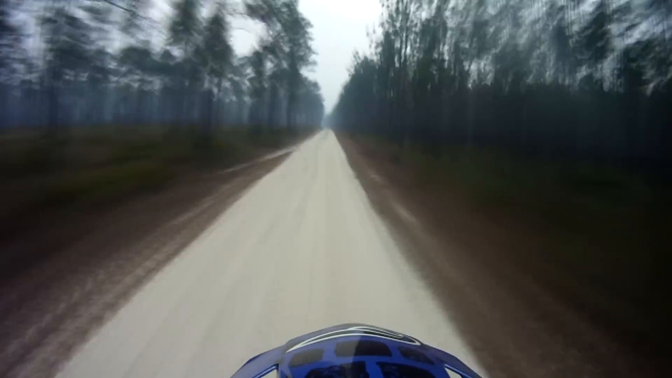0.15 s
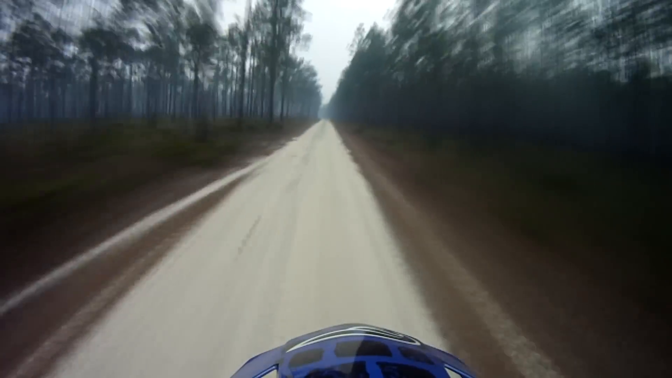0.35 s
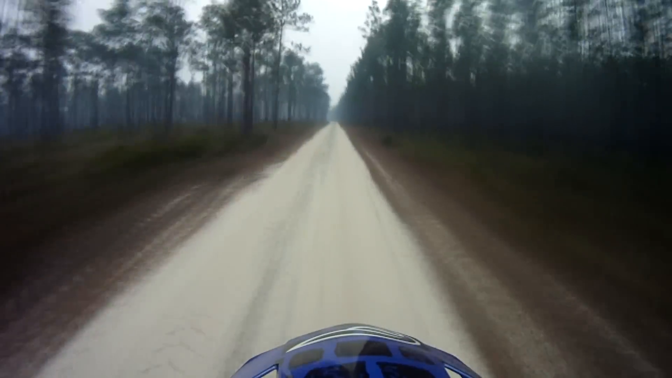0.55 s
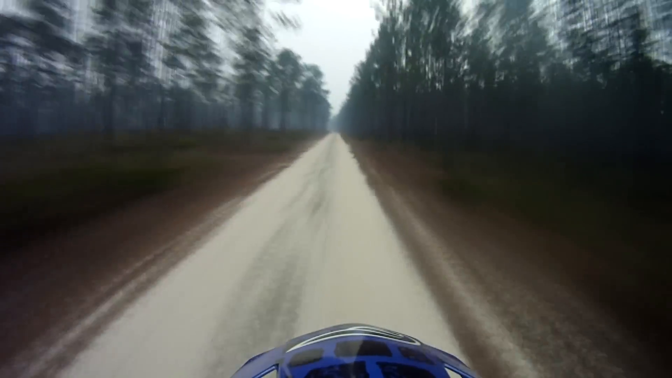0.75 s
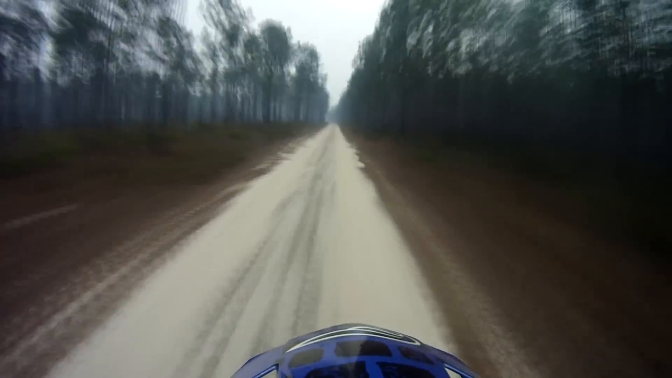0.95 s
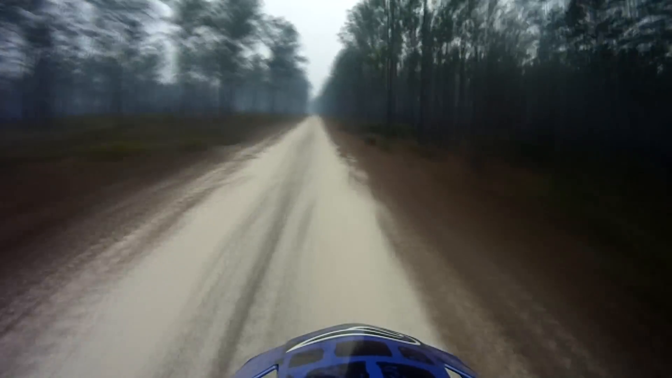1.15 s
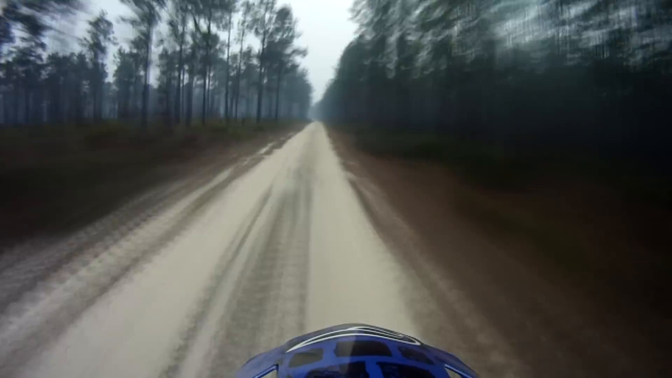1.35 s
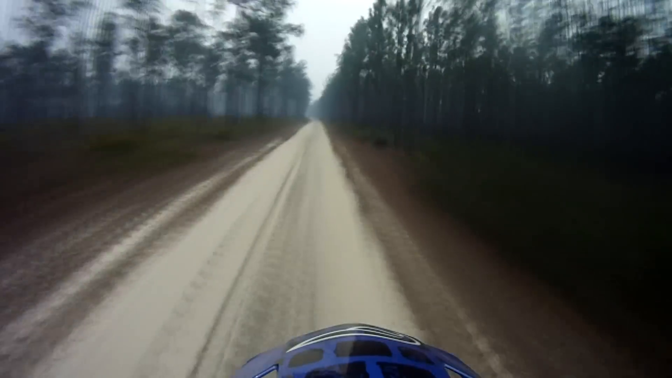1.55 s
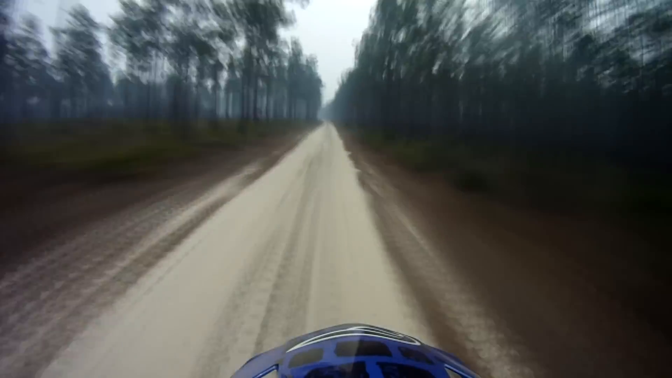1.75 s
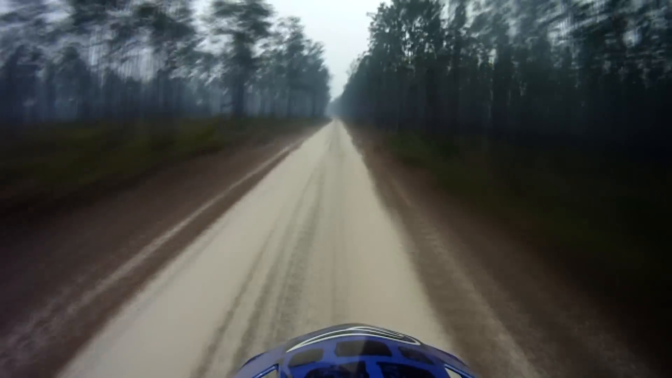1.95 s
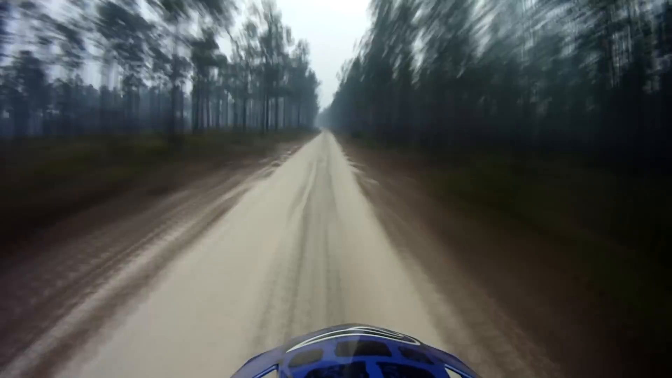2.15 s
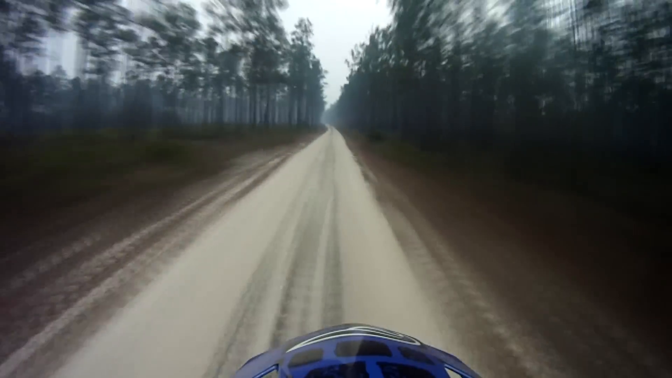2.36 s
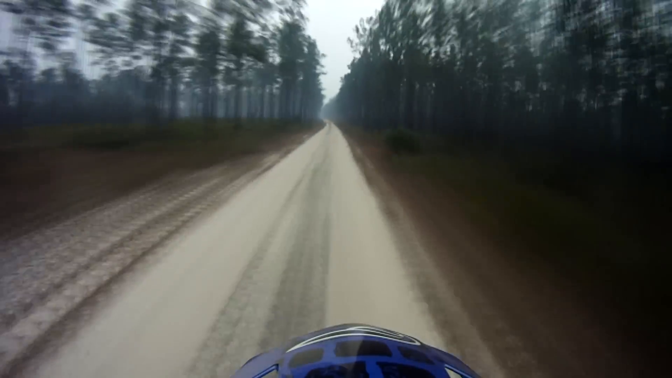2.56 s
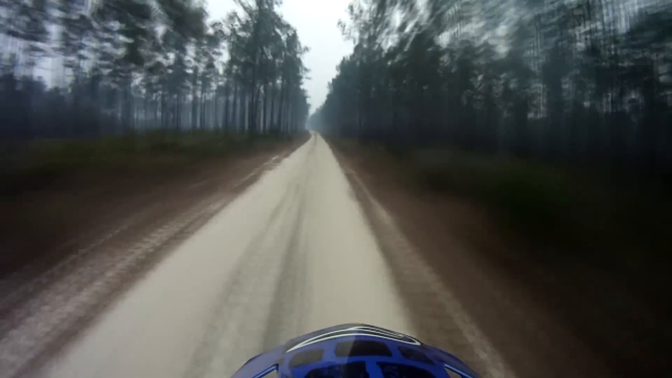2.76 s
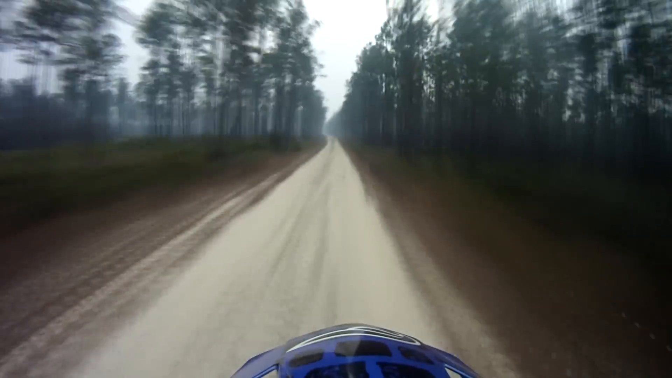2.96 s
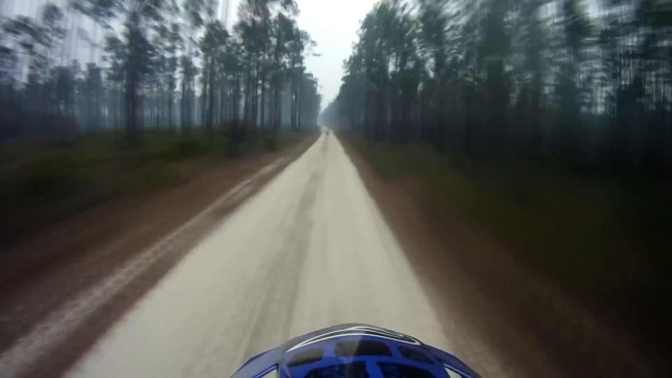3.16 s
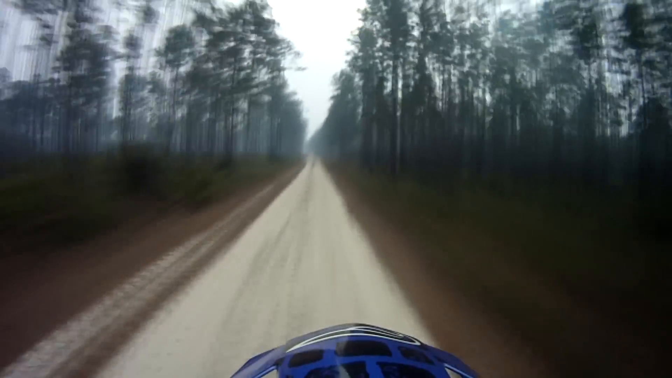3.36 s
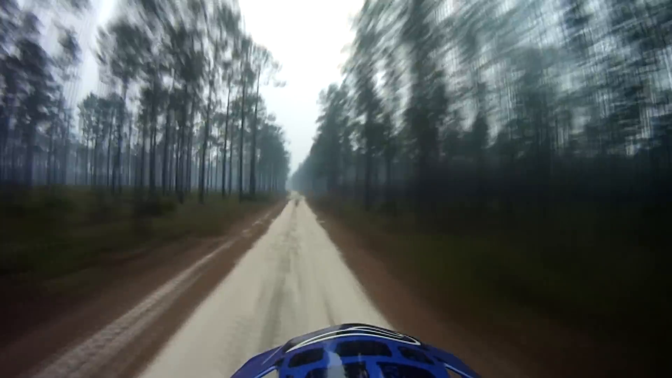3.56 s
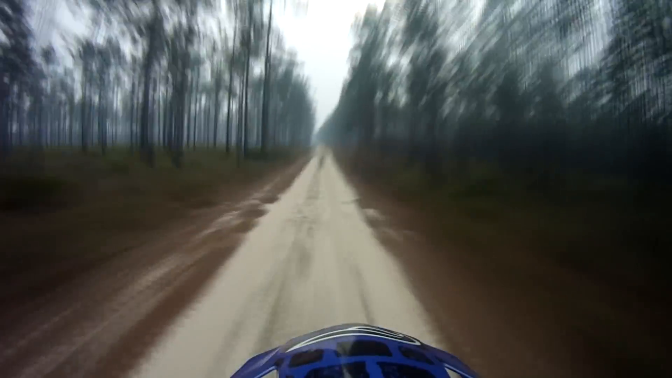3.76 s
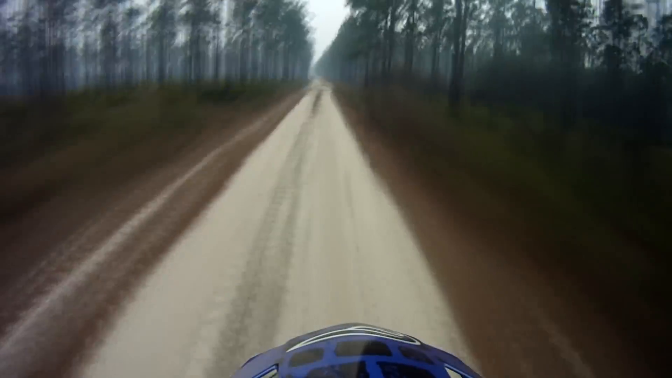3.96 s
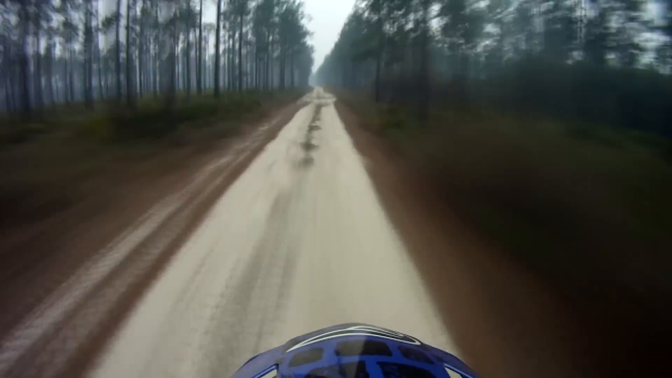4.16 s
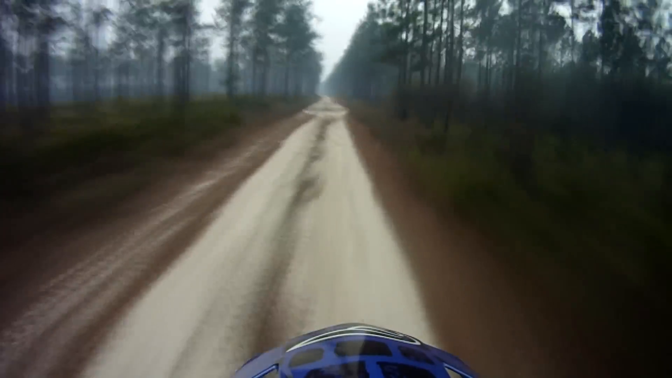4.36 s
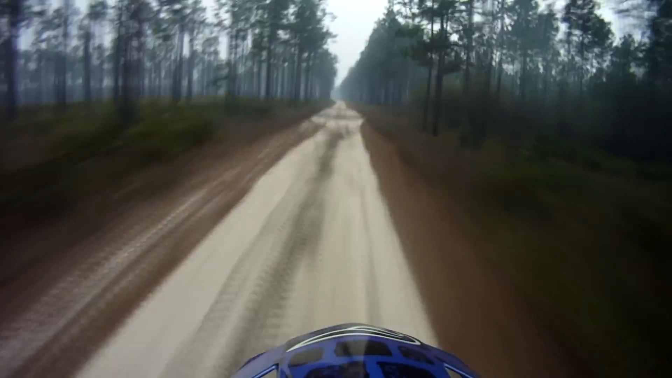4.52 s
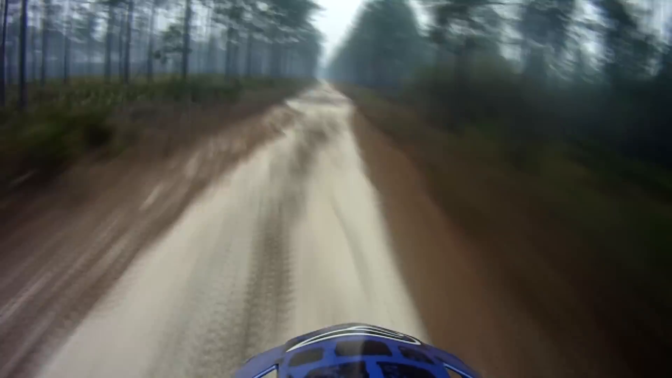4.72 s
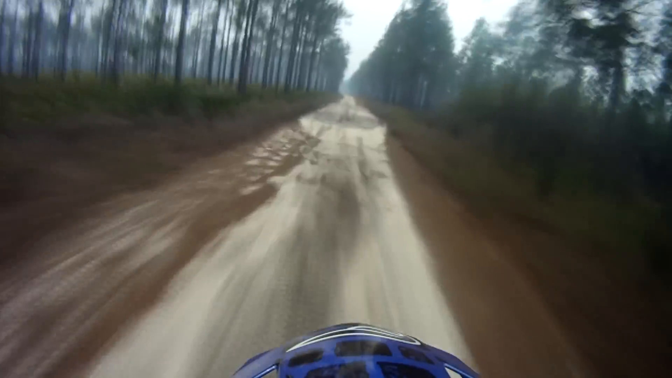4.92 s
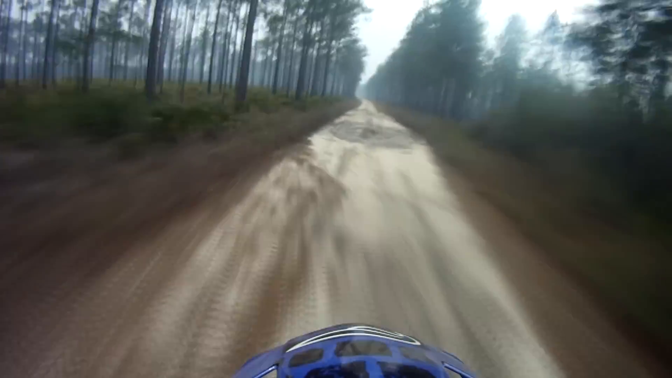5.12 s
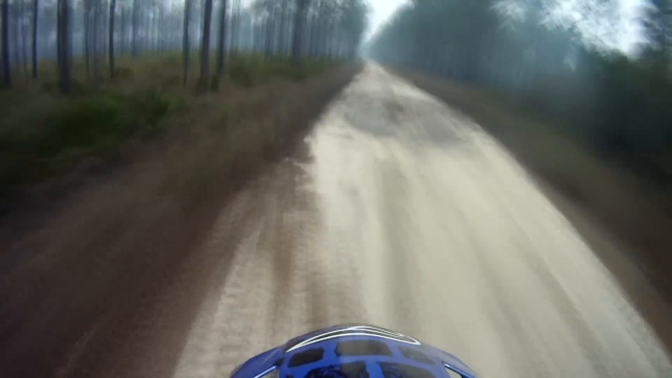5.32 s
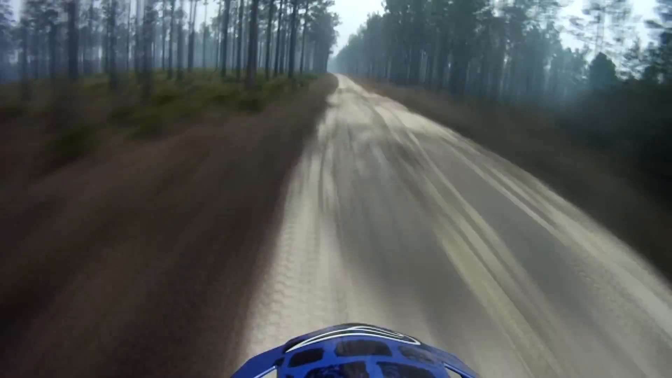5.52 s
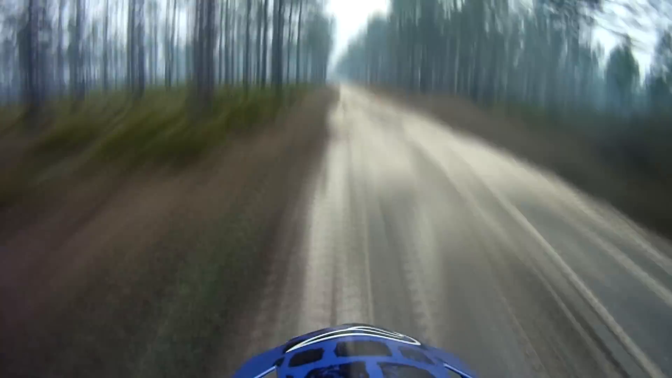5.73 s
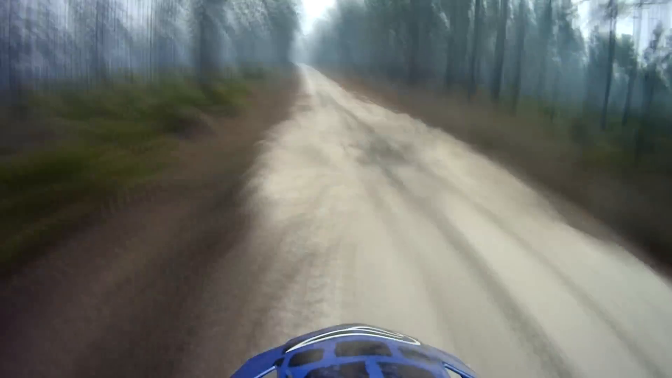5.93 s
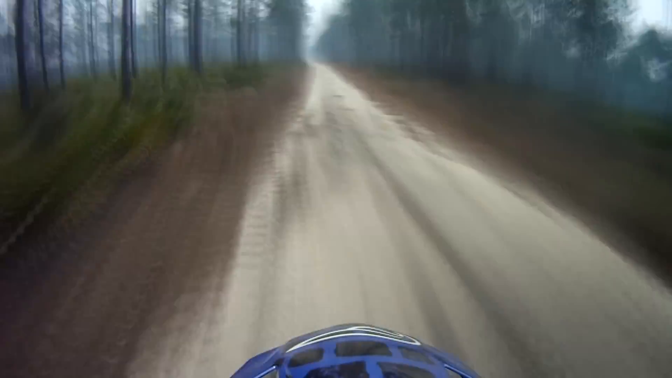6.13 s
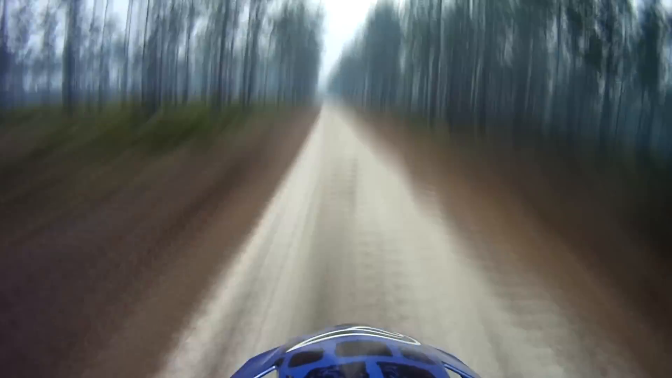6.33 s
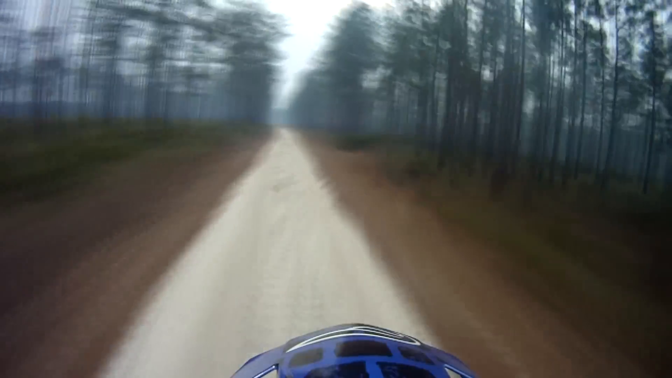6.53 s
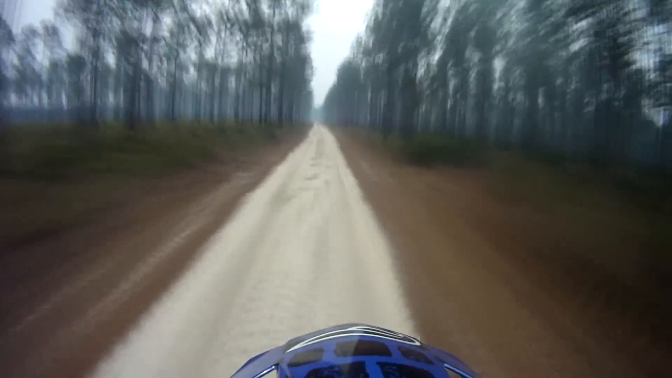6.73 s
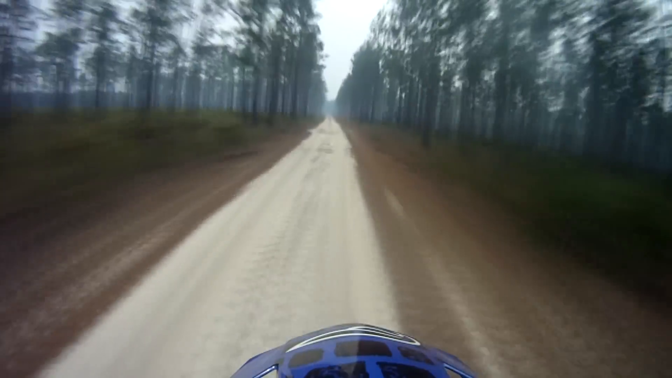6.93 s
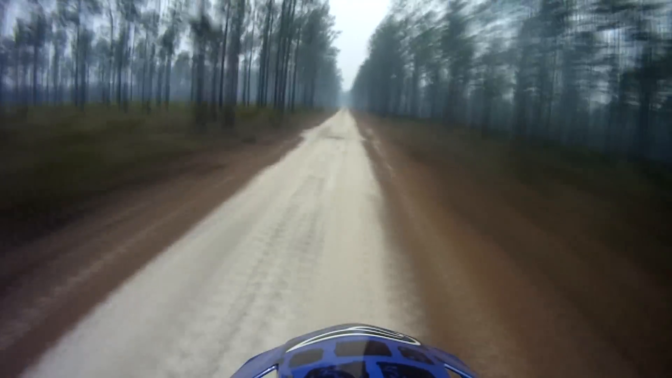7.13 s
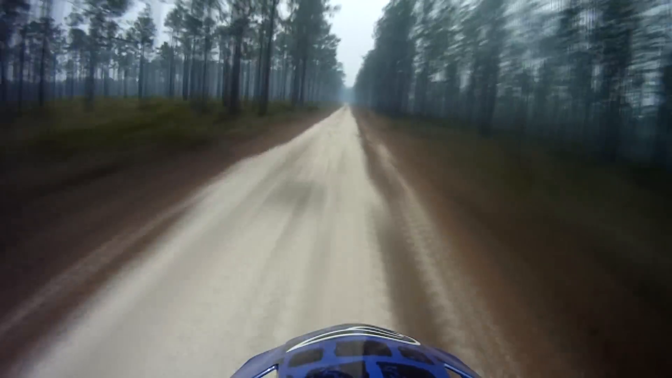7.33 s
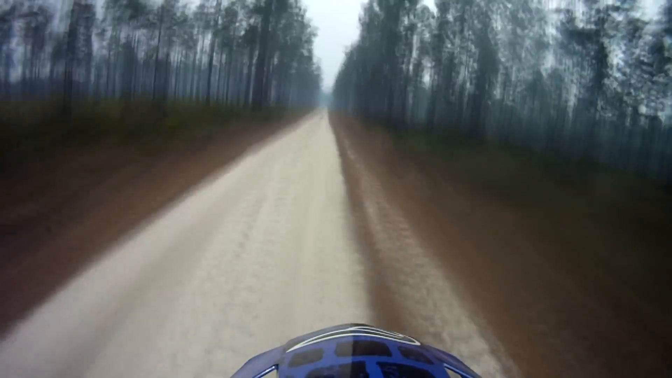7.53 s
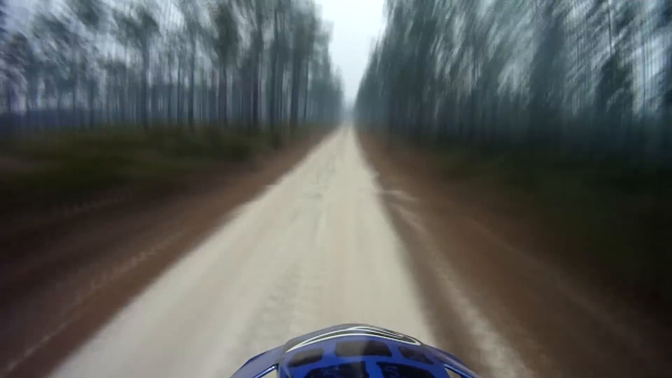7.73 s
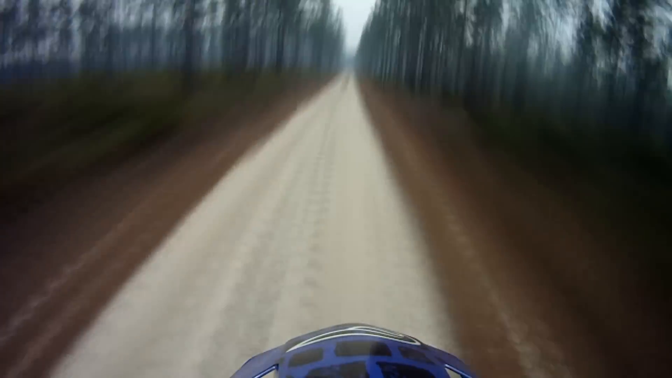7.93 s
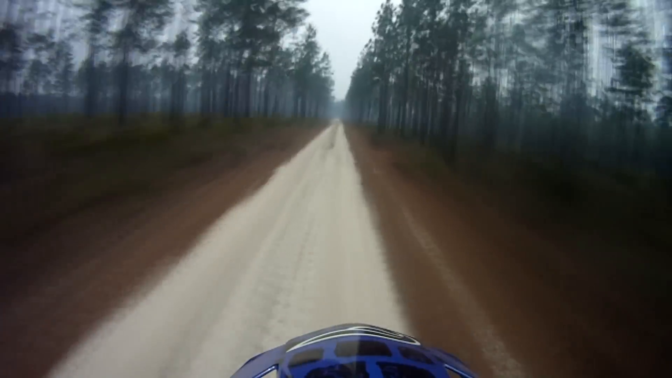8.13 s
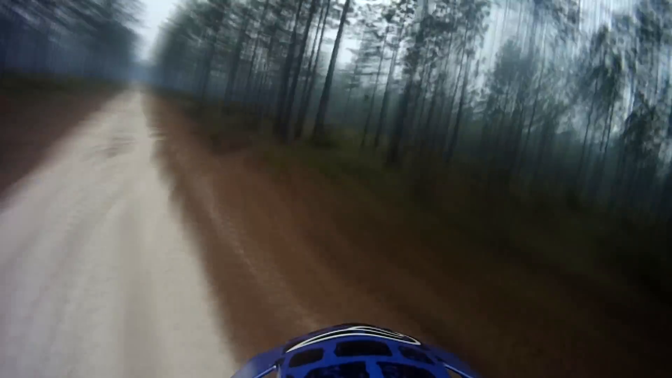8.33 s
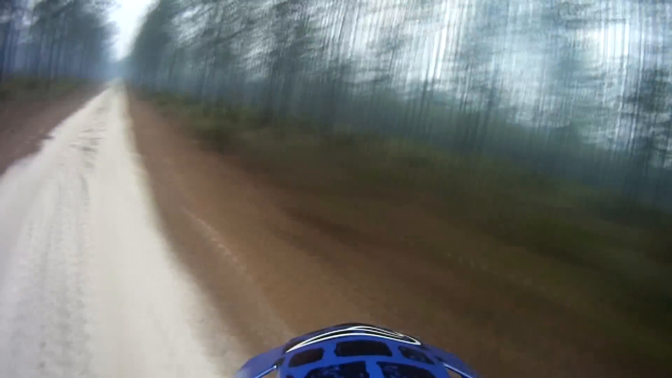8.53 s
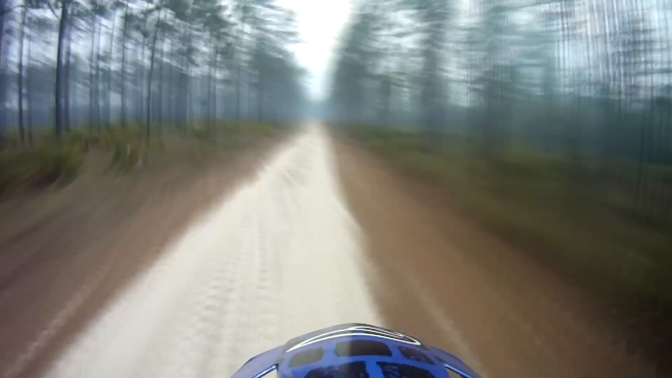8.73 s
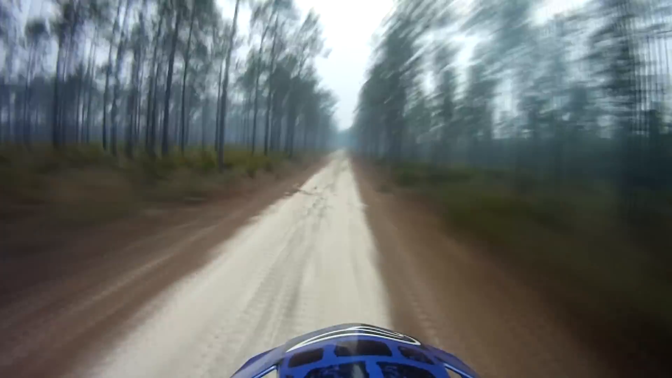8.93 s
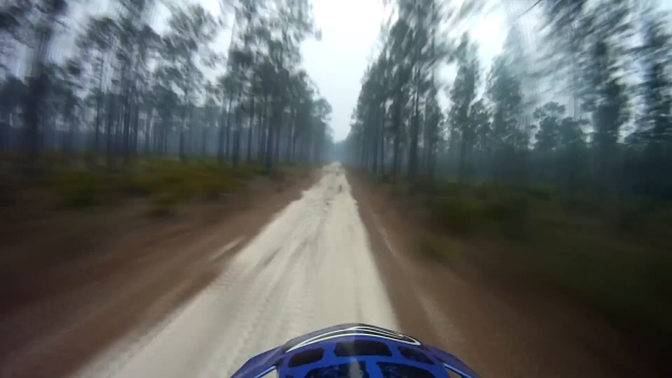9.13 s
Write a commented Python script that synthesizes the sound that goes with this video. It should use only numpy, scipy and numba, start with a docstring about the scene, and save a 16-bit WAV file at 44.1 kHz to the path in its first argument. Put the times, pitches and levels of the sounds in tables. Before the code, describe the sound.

A helmet-mounted microphone on a motorcycle is swamped by rough, fluttering wind roar, with breathy whistles and a faint wavering exhaust drone underneath. Around four seconds the wind falls sharply to a near hush as the rider slows for a rough patch. The engine then pulls up through the gears, a heavy low thud hits just after six seconds, and the roar returns, easing slightly at the end.

```python
"""A helmet camera in a closed case rides a motorcycle along a dirt road, its one microphone in the wind.
At full speed coloured noise roars through the resonances of the case, and narrow noise whistles at its gaps.
The rider slows until the roar sinks; then speeds up through the gears, with sine thuds from the mount.
Throughout, low noise bands shake the mount and a wavering exhaust order drones faintly.
Samples held at 12 kHz mirror the sound in the treble; three spliced strands overlap."""
import sys
import numpy as np
from scipy import signal
from scipy.fft import rfft, irfft, next_fast_len
from scipy.io import wavfile
from scipy.ndimage import uniform_filter1d
from numba import njit

SR = 44100
rng = np.random.default_rng(int(sys.argv[2]) if len(sys.argv) > 2 else 0)


def generate_wav(sig):
    """Save sig (samples, or channels by samples) to the path in sys.argv[1] as 16-bit PCM at SR."""
    pcm = np.round(np.clip(np.atleast_2d(sig).T, -1, 1) * 32767).astype(np.int16)
    wavfile.write(sys.argv[1], SR, pcm)


def amplitude_ratio(level_db):
    """Convert a level in decibels to the matching linear amplitude (field) ratio."""
    exponent = np.asarray(level_db, float) / 20
    return 10 ** exponent


N = 404838
CLOCK = 12000  # Hz, sample clock of the camera
COUNT = N * CLOCK // SR + 8
T = np.arange(COUNT) / CLOCK  # s
CRUISE_DB = -27  # airflow level at full speed

# airflow over the case: t/s, airflow level/dB, brightness/dB as the head turns in the stream
AIRFLOW = [(0.0, -27.5, 0), (1.18, -28.5, -0.5), (1.2, -29.5, 0.5), (1.81, -27, 0), (2.38, -28, -0.5),
           (2.74, -27.5, 0), (2.76, -30, 0.5), (3.01, -28, -0.5), (3.48, -32.5, 0.5), (3.58, -30, -3),
           (3.91, -37, 0), (4.86, -55.5, 0.5), (5.34, -51.5, 0), (5.85, -42.5, -1.5), (6.01, -38, -1),
           (6.08, -38.5, 0.5), (6.39, -37, 0), (6.62, -32, 0), (7.54, -31.5, 1), (7.75, -28, 0.5),
           (8.08, -32.5, 2), (8.13, -30, 1), (8.82, -36, 1), (9.18, -37, -0.5)]


def curves(table):
    """Columns of a table at every tick of the clock."""
    s, *columns = np.transpose(table)
    return [np.interp(T, s, column) for column in columns]


def follow(full_db, slope):
    """Level in dB of a layer that grows with the airflow: level at full speed, dB per dB of airflow."""
    return full_db + slope * (curves(AIRFLOW)[0] - CRUISE_DB)


def unit(x):
    """Scale to rms 1."""
    return x / np.sqrt(np.mean(x ** 2))


def noise():
    """White noise."""
    return rng.standard_normal(COUNT)


def walk(rate):
    """Random levels held 1 / rate s and slewed twice."""
    k = int(CLOCK / rate)
    steps = np.repeat(rng.standard_normal(COUNT // k + 1), k)
    return uniform_filter1d(uniform_filter1d(steps, k), k)[:COUNT]


@njit
def svf(x, hz, width, clock):
    """Band-pass with a moving centre, gain 1 there."""
    y, b, l = np.empty(len(x)), 0., 0.
    for i in range(len(x)):
        g, k = np.tan(np.pi * hz[i] / clock), width / hz[i]
        v = (b + g * (x[i] - l)) / (1 + g * (g + k))
        b, l, y[i] = 2 * v - b, l + 2 * g * v, k * v
    return y


def ring(x, hz, width):
    """A resonance applied twice, so that its flanks are steep; width in Hz is that of one pass."""
    hz = hz + 0 * T
    once = svf(x, hz, 1. * width, 1. * CLOCK)
    return svf(once, hz, 1. * width, 1. * CLOCK)


def bursts(table):
    """Short sine swings under a bell-shaped swell."""
    out = 0
    for s, db, hz, length in table:
        bell = np.exp(-((T - s) / length) ** 2)
        out = out + amplitude_ratio(db) * bell * np.sin(2 * np.pi * hz * (s - T) + .5)
    return out


def engine():
    """One wavering exhaust order stands clear; uneven firings at a quarter of it ring the pipe."""
    # engine speed and load, dropping at each upshift: t/s, f/Hz of the nominal exhaust order, level/dB
    revs = [(0, 262, -53.5), (1.4, 268, -49.5), (2.5, 287, -49), (3.1, 285, -53), (3.6, 270, -49),
            (4.0, 245, -73), (4.6, 235, -63), (4.9, 185, -65), (5.1, 182, -52), (5.3, 203, -55.5),
            (5.58, 232, -60), (5.66, 186, -55), (5.95, 195, -49), (6.4, 230, -55), (6.47, 180, -47.5),
            (6.9, 213, -49), (7.4, 235, -58), (8.0, 258, -51), (8.3, 245, -52), (8.6, 215, -48.5),
            (9.18, 230, -63)]
    # partials beside the strongest one: multiple of the nominal order, level/dB relative to the strongest
    overtones = [(1.75, -19), (.75, -6)]
    # resonances of the exhaust pipe: f/Hz, width/Hz of one pass, relative level/dB
    pipe_modes = [(231.8, 54, 4), (208, 71, 1.5)]
    hz, order_db = curves(revs)
    turns = np.cumsum(hz * (1 + .016 * walk(25))) / CLOCK  # cycles of the nominal order
    partials = [(0.98, 0)] + overtones
    order = unit(sum(amplitude_ratio(db) * np.sin(2 * np.pi * k * turns) for k, db in partials))
    firings = np.diff(np.floor(turns / 4), prepend=0) * amplitude_ratio(3.0 * noise())
    drive = unit(firings) + 2.0 * noise()
    pipe = unit(sum(amplitude_ratio(db) * unit(ring(drive, f, width)) for f, width, db in pipe_modes))
    pipe_db = follow(-43.5, 0.54) + 1.5 * walk(9)
    return amplitude_ratio(order_db + 2.6 * walk(11)) * order + amplitude_ratio(pipe_db) * pipe


def thuds():
    """Jolts thud in the mount as short low swings."""
    # jolts: t/s, level/dB at the peak of the swell, f/Hz, length/s from the peak down to 1/e
    blows = [(5.17, -41, 30, 0.024), (5.705, -35.5, 39.4, 0.025), (6.178, -16.5, 66, 0.011),
             (6.459, -30, 22, 0.043), (6.791, -32.5, 22, 0.058), (7.597, -31.5, 25, 0.11),
             (8.491, -29, 30, 0.039), (8.559, -36.5, 110, 0.06)]
    return bursts(blows)


def mount(swells):
    """Road and buffeting shake the mount; it rings at a few low modes."""
    # roughness of the road as felt by the mount: t/s, shaking level/dB ahead of the ring
    road = [(0, -38.5), (1.2, -41), (2.6, -38), (3.2, -44), (3.55, -40), (4.1, -51.5), (4.8, -56.5),
            (5.3, -53), (6.0, -44), (6.7, -40), (7.3, -42), (7.6, -38), (8.1, -40), (8.5, -38.5),
            (8.9, -45.5), (9.18, -45)]
    # low modes of the mount: f/Hz, width/Hz of one pass, relative level/dB
    low_modes = [(66, 20.3, -2.5), (42.8, 24, -11), (92, 77, -12), (153, 114, -14.5)]
    ring_db = 2  # ring of the mount over the shaking
    shake_swell, buffet_swell = 1 * swells  # dB
    ringing = unit(sum(amplitude_ratio(db) * unit(ring(noise(), hz, width)) for hz, width, db in low_modes))
    buffeting = unit(ring(noise(), 14.6, 57))
    shaken = amplitude_ratio(curves(road)[0] + ring_db + shake_swell) * ringing
    return shaken + amplitude_ratio(follow(-44.5, 0.29) + buffet_swell) * buffeting


def flares():
    """The whistles flare up clearly for a moment, as short swings."""
    # flares: t/s, level/dB at the peak of the swell, f/Hz, length/s from the peak down to 1/e
    whistled = [(4.0, -41, 1140, .03), (4.5, -51, 1010, 0.054), (4.77, -48, 1120, 0.031),
                (5.3, -47.5, 1150, 0.029), (5.95, -39.5, 1142, 0.057), (5.97, -36, 2240, 0.076),
                (4.95, -55, 1240, .04), (6.07, -38.5, 2410, 0.039), (6.32, -33, 1163, 0.04),
                (6.49, -33, 1180, 0.011), (8.33, -30.5, 998, 0.016)]
    return bursts(whistled)


def rush(colour, eddies, own_db, shared_db):
    """Turbulence coloured by the case; third-octave bands flicker together and alone."""
    # resonances and dips of the case: f/Hz, width/Hz, gain/dB
    case = [(780, 55, -2), (992, 44, 4), (1370, 120, 0.5), (1570, 69, 5.5), (1710, 90, -1),
            (2030, 140, -1.5), (3080, 69, 3), (640, 39, -4.5), (3667, 95, 5), (5560, 60, -6),
            (5650, 120, 4.5), (4150, 150, 3)]
    size = next_fast_len(COUNT)
    f = np.arange(1, size // 2 + 2) * CLOCK / size
    hz, db = np.transpose(colour)
    shape_db = np.interp(np.log(f), np.log(hz), db, -90, -90)
    for centre, width, gain_db in case:
        shape_db = shape_db + gain_db / (1 + (2 * (f - centre) / width) ** 2)
    spectrum, out = rfft(noise(), size) * amplitude_ratio(shape_db), 0
    thirds = 3 * np.log2(f)
    for k in range(int(3 * np.log2(hz[0])), int(3 * np.log2(hz[-1])) + 2):
        share = np.cos(np.pi / 2 * np.clip(thirds - k, -1, 1)) ** 2
        band = irfft(spectrum * share, size)[:COUNT]
        out = out + band * amplitude_ratio(own_db * walk(14))
    return unit(out * amplitude_ratio(shared_db * eddies))


def whistles(swells):
    """Air whistles through gaps of the case as two narrow bands; the high one rises as the air slows."""
    airflow_db = curves(AIRFLOW)[0]
    low_swell, high_swell = 3.0 * swells  # dB
    low = unit(ring(noise(), 1140 + 30 * walk(6), 57))
    rise_hz = 3 * (CRUISE_DB - airflow_db)
    high = unit(ring(noise(), 2120 + rise_hz, 133))
    low_gain = amplitude_ratio(follow(-39.5, 0.65) + low_swell)
    return low_gain * low + amplitude_ratio(follow(-39, 0.8) + high_swell) * high


def wind(eddies, swells):
    """Roar, treble and whoosh on one airflow, with two whistles that swell by themselves."""
    # spectra ahead of the case: f/Hz, relative level/dB per Hz
    roar = [(410, -43), (700, -18.5), (790, -10.5), (886, -5), (1130, -7.5), (1240, -4), (1570, -6),
            (1720, -7.5), (2050, 1.5), (3200, -15), (4160, -30), (7040, -120)]
    treble = [(1710, -41), (2900, -10.5), (3320, -4), (3710, -2), (4530, -13), (5240, -4), (5470, -9),
              (5990, -20), (7790, -52), (13200, -120)]
    whoosh = [(170, -17), (290, -2), (328, -7), (397, -6.5), (555, -2.5), (616, -6.5), (706, -1),
              (780, -2.5), (1010, -16), (1720, -120)]
    airflow_db, bright_db = curves(AIRFLOW)
    flow = amplitude_ratio(airflow_db + 1) * rush(roar, eddies, 0.52, 0.4)
    flow = flow + amplitude_ratio(follow(-38.5, 1.165) + bright_db) * rush(treble, eddies, 0.56, 0.6)
    flow = flow + amplitude_ratio(follow(-42.5, 0.72)) * rush(whoosh, eddies, 0.65, 0.36)
    # slower air leaves a hollow between the two whistles
    fill_db = follow(1.14, 0.19) - 0.51 * bright_db
    flow = flow + (amplitude_ratio(fill_db) - 1) * ring(flow, 1720, 900)
    return flow + whistles(swells)


def held(x):
    """Samples held for four ticks of 48 kHz; at uneven splices the clock fades to one up to three ticks off."""
    splice_s = .045  # nominal spacing, which wanders
    tick = np.arange(4 * (COUNT - 1))
    pace = np.cumsum(amplitude_ratio(5 * walk(12)))
    place = np.repeat(pace, 4)[:len(tick)] / CLOCK / splice_s + rng.random()
    splice = place.astype(int)
    slip = rng.integers(0, 4, splice[-1] + 2)
    fade = np.sin(np.pi / 2 * np.minimum((place - splice) * 5, 1)) ** 2
    before = x[(tick + slip[splice]) // 4]
    after = x[(tick + slip[splice + 1]) // 4]
    joined = (1 - fade) * before + fade * after
    return signal.resample_poly(joined, 147, 160)[:N]  # 48 kHz to SR


def scene():
    """Three strands of the same ride overlap; both channels carry one microphone, all but alike."""
    eddies = walk(11) + 1.05 * walk(40)
    whistling = np.array([walk(8), walk(7.2)])
    shaking = np.array([walk(7), walk(8)])
    strands = [(wind(eddies, whistling) + mount(shaking)) / np.sqrt(3) for _ in range(3)]
    first = held(strands[0] + engine() + thuds())
    rest = held(strands[1] + flares()) + held(strands[2])
    return first + rest + amplitude_ratio(-38.5) * np.outer([1, -1], first - rest)


def roll_off(x):
    """The treble ends steeply here."""
    return signal.sosfilt(signal.butter(12, 15270, fs=SR, output="sos"), x)


def record(dry):
    """Mixing in the previous sample softens the top slightly; a small constant offset is added."""
    soft = .06  # share of the previous sample
    top = (1 - soft) * dry + soft * np.roll(dry, 1, axis=1)
    mix = top + amplitude_ratio(-62)
    return roll_off(mix)


dry = scene()
out = record(dry)
generate_wav(out)
```